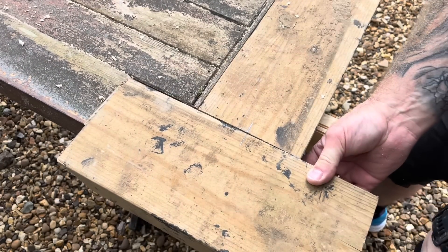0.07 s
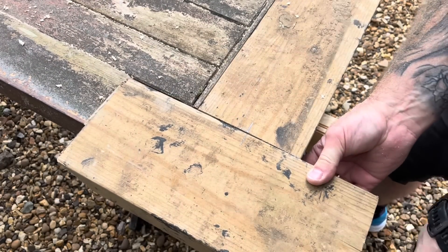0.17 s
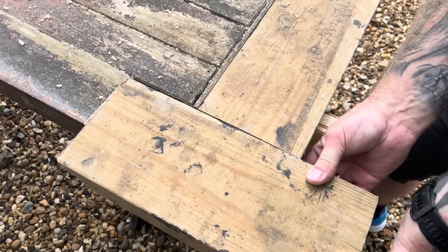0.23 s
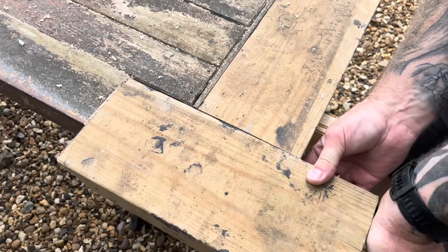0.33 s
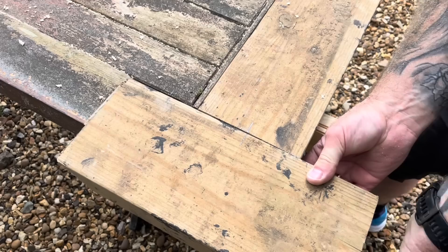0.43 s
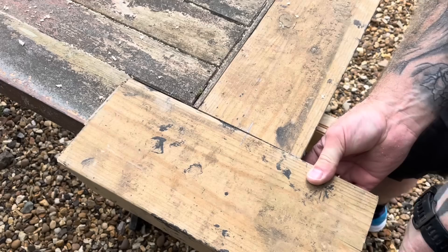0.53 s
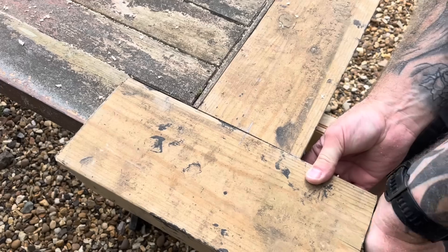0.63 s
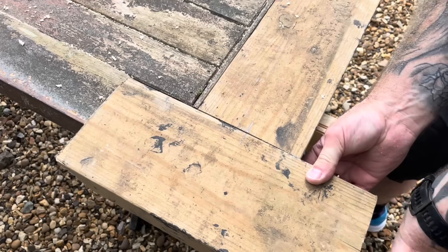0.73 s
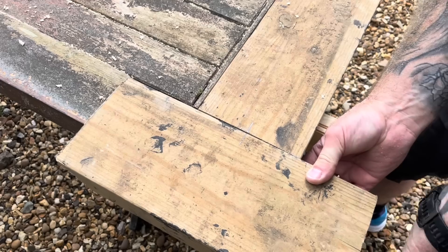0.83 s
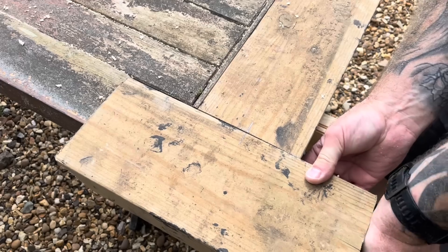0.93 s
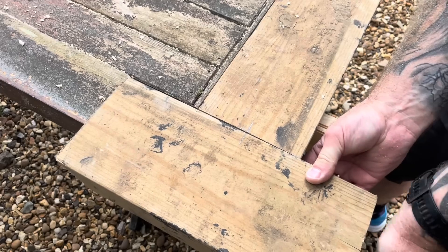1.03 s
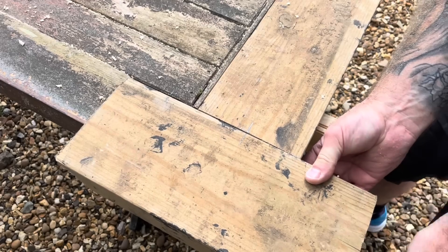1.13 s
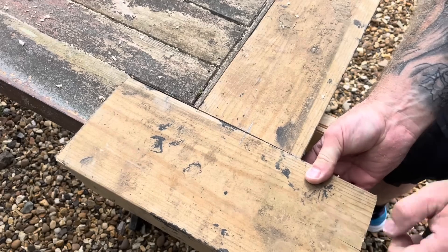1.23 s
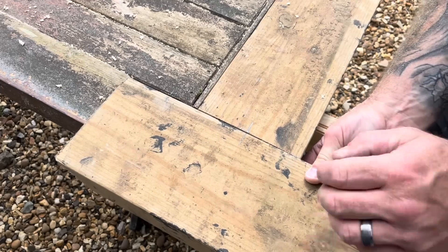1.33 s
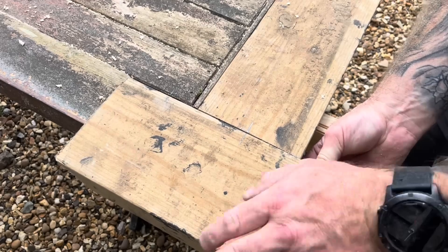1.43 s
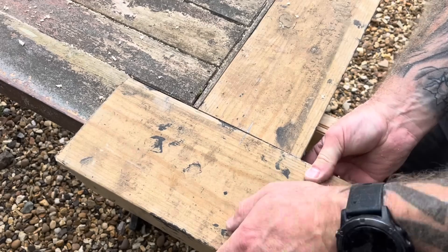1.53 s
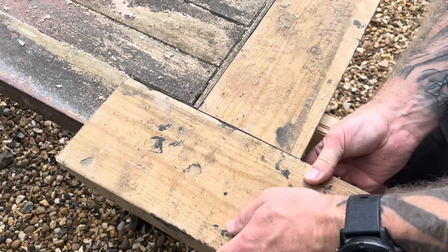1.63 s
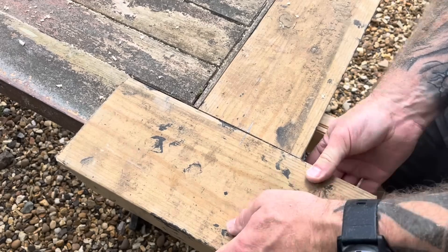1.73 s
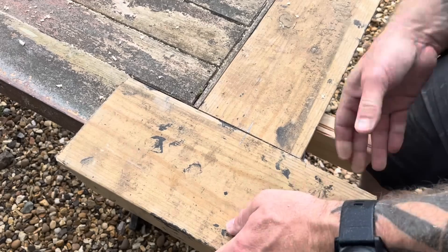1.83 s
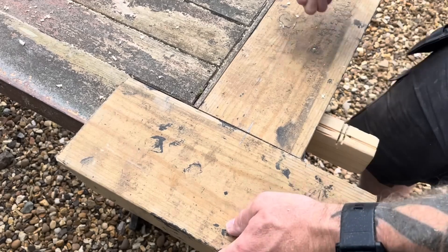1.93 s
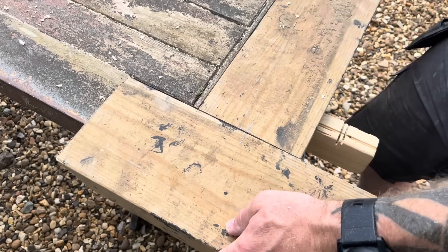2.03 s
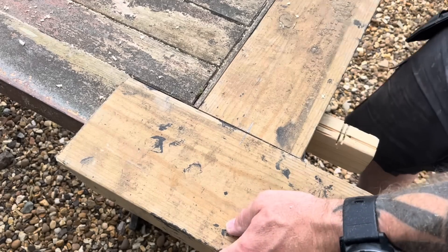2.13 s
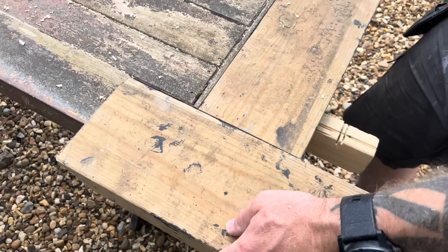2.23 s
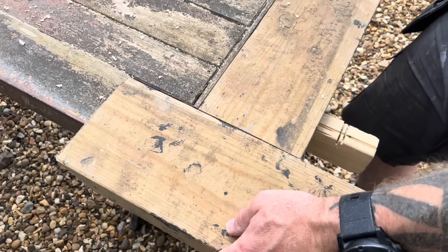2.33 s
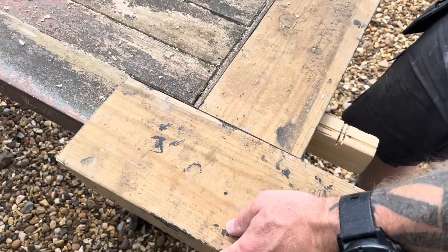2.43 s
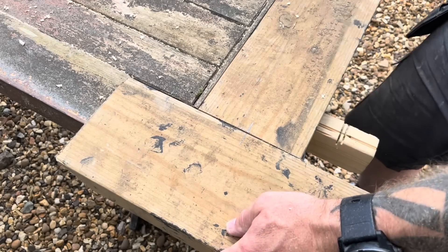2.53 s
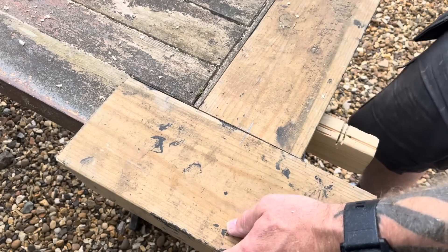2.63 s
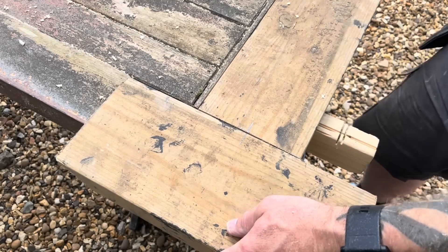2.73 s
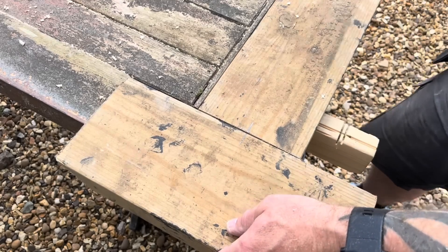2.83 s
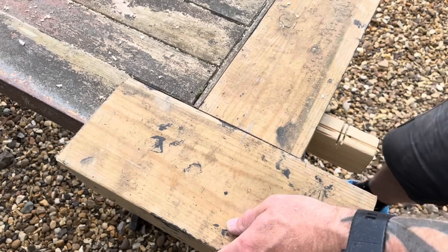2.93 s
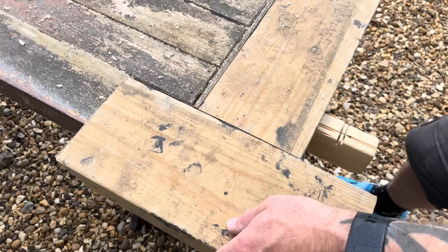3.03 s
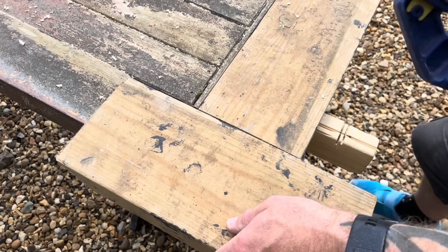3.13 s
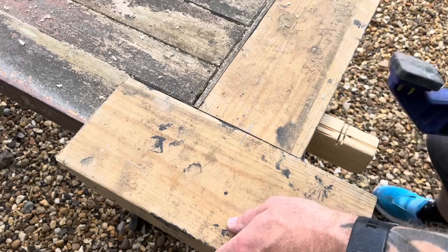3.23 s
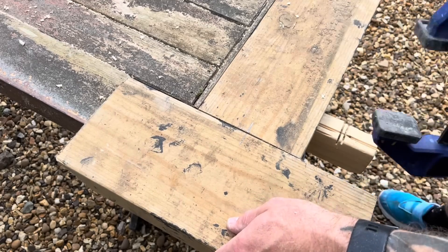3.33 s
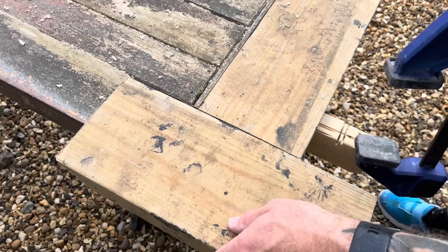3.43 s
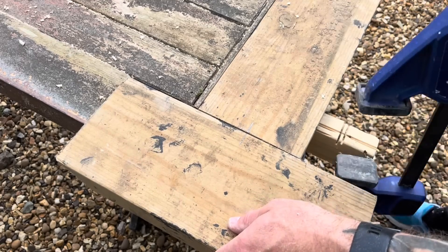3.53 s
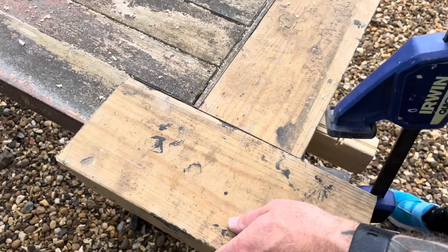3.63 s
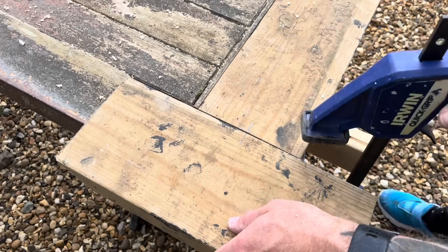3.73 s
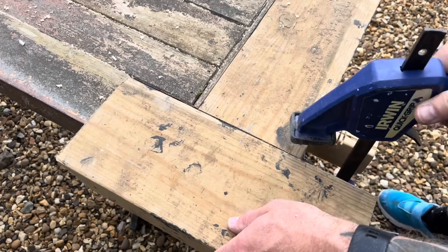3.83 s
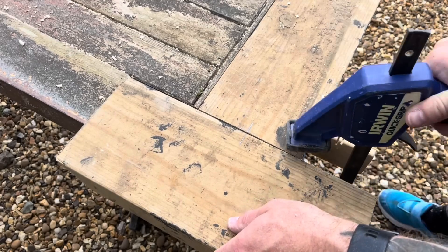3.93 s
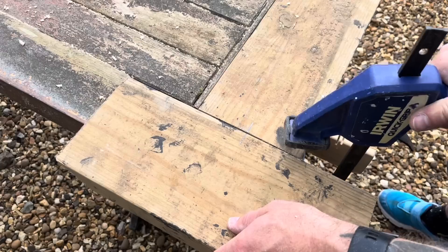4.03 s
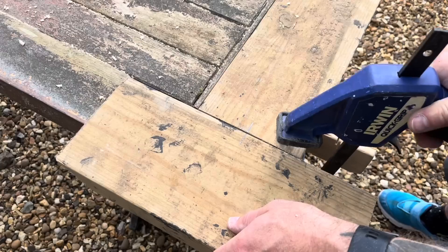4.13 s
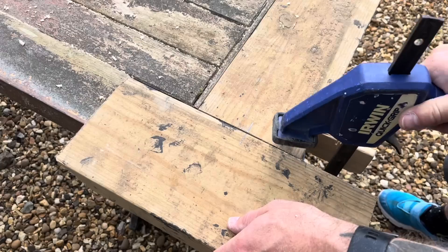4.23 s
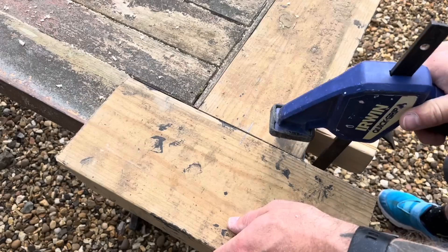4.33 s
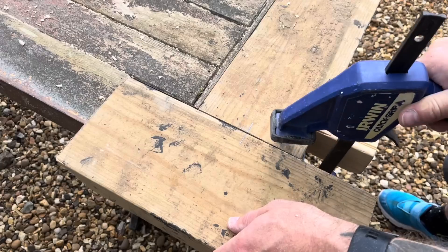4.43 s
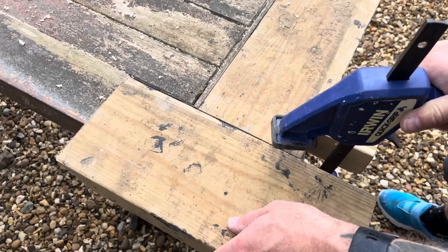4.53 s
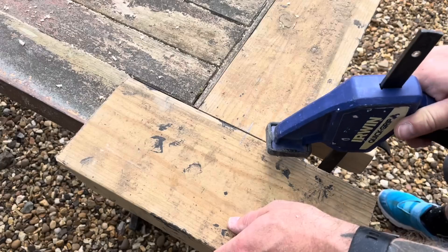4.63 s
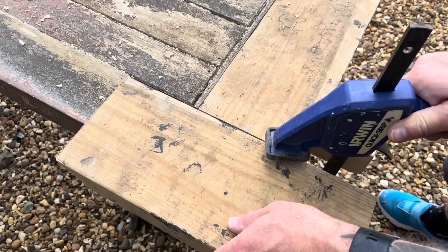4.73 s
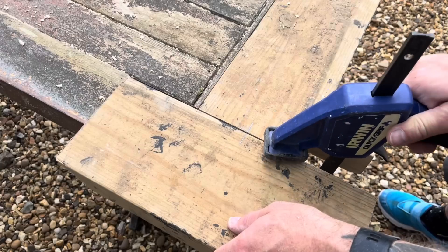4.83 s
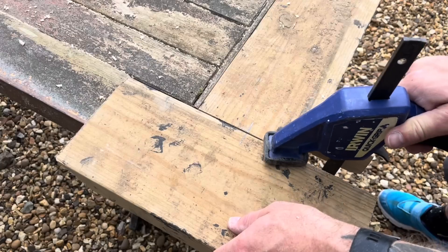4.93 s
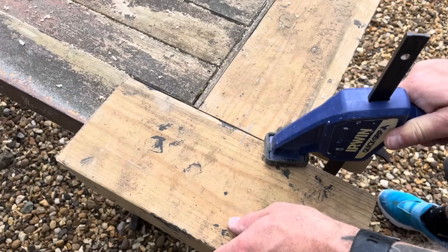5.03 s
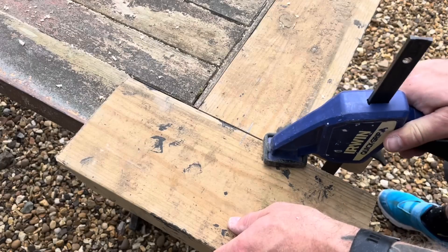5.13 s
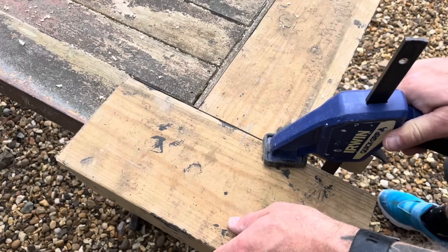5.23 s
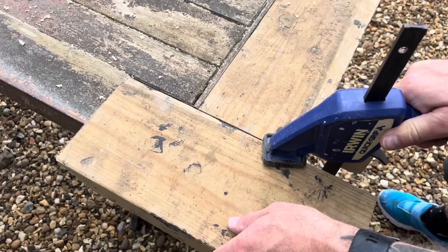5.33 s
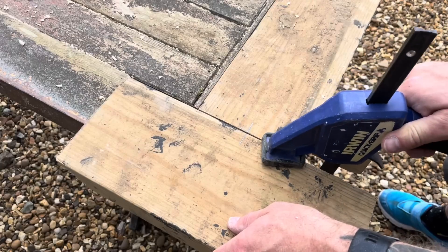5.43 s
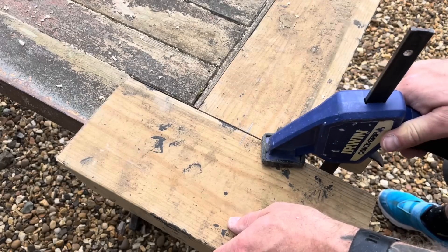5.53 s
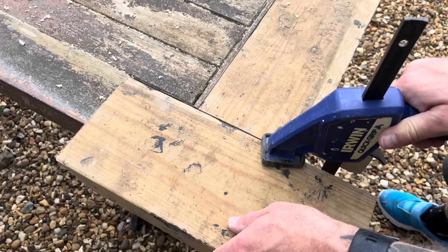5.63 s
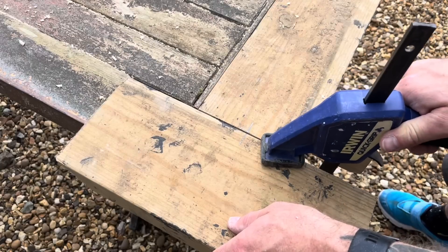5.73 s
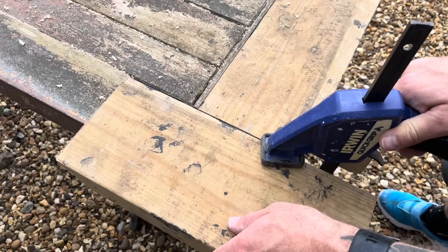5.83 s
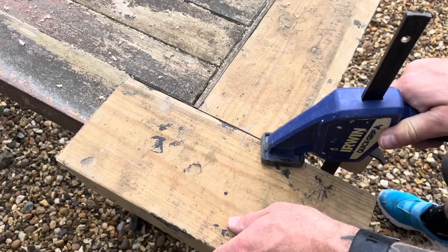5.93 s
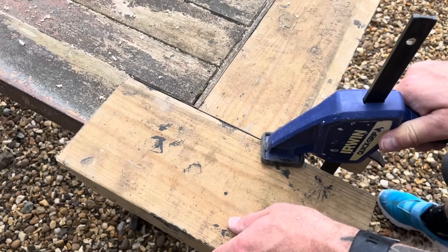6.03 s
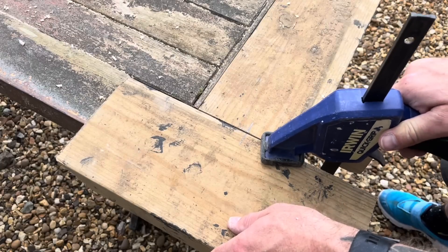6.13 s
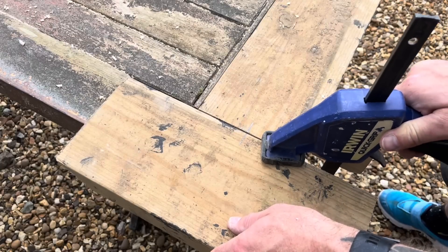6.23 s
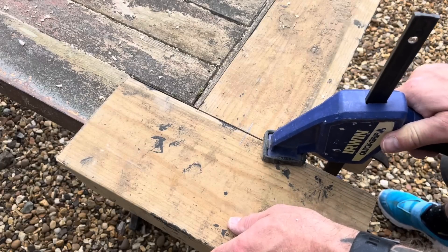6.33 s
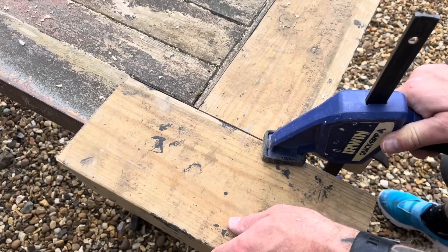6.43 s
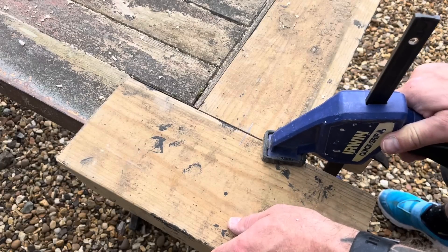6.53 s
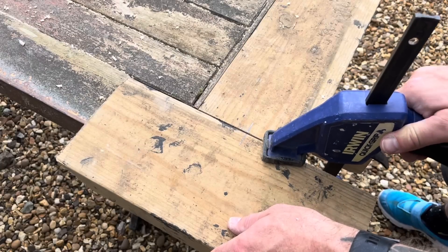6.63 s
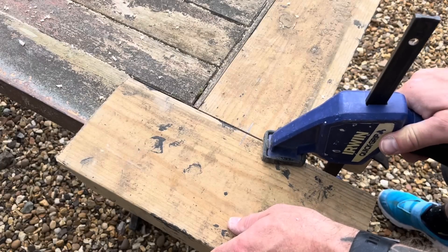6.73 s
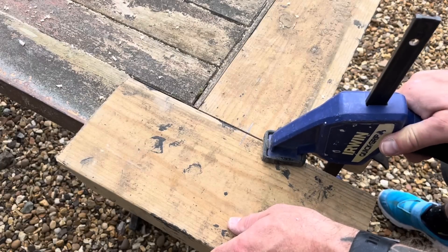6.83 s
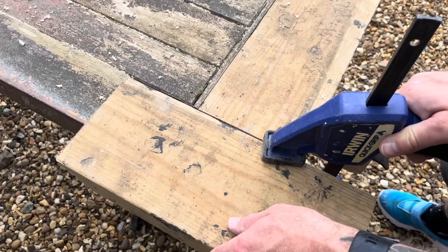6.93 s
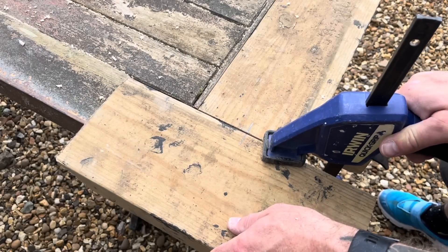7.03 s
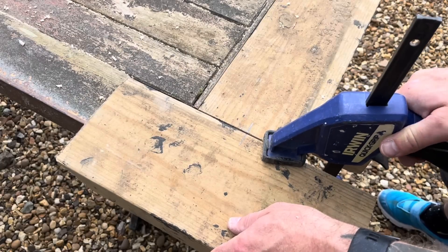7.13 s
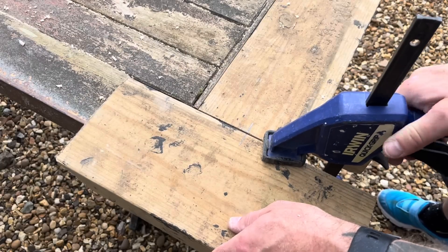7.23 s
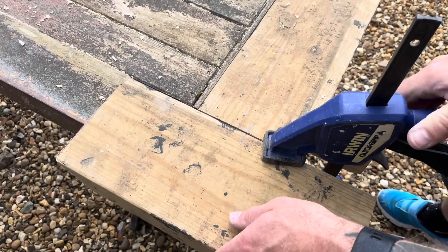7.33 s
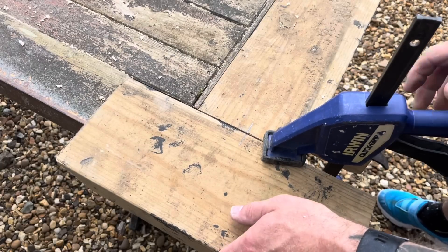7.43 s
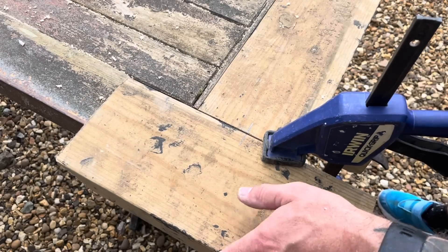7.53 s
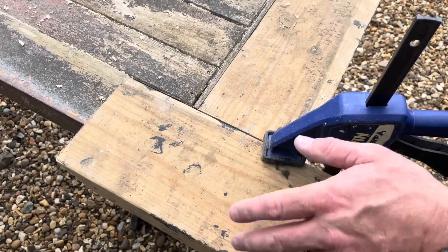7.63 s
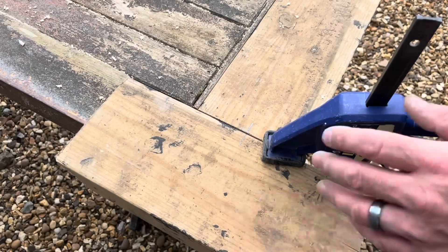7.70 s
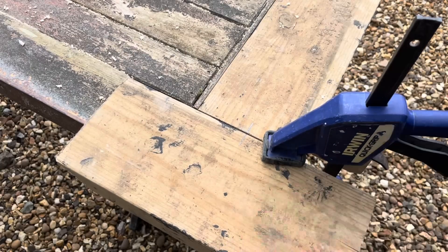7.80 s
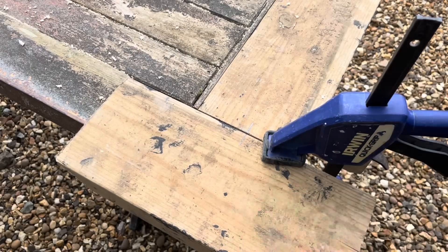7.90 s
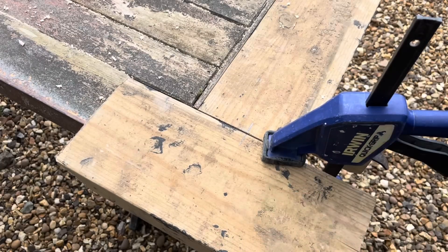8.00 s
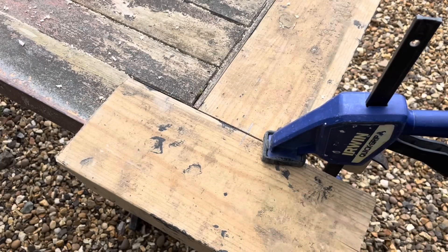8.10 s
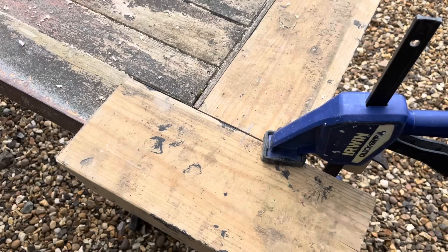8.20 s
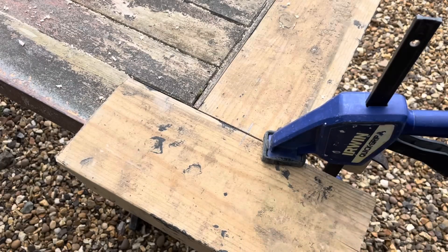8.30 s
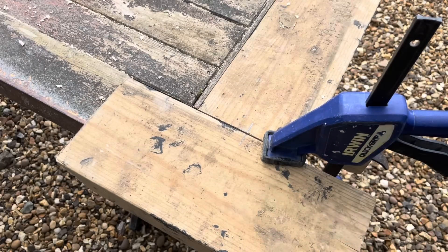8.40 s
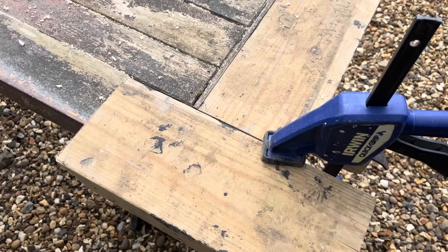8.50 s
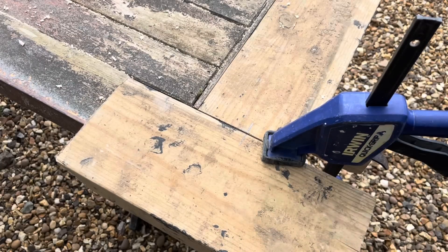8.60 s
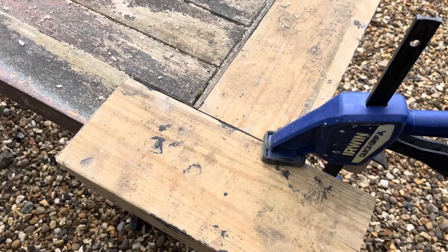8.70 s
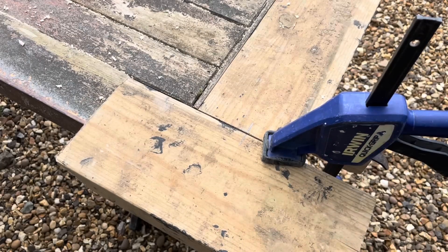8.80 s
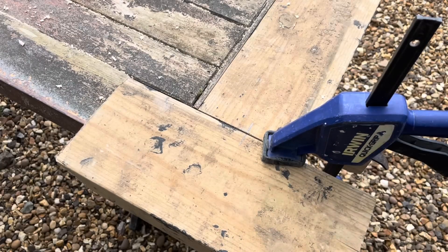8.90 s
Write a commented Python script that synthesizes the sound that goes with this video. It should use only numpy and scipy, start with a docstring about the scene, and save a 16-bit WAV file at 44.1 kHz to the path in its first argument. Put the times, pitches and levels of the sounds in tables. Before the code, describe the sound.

Outdoors and close up, timber knocks, stones clack underfoot, and a one-handed bar clamp clicks rapidly, then thumps the wood as it bites.

```python
"""A sleeve rustles close by over a soft outdoor wash; then wood taps, boards clack and boom as they are nudged.
Feet crunch in gravel, and a one-handed bar clamp is pumped: its metal snaps and rings, and the bar slides.
Once the jaws bite, the plate's snaps also thump the timber; at the end sleeves rustle and a shoe drags.
Ringing modes make the metal, stones and boards; shaped noise and tiny impacts make the friction, gravel and air.
Place: outdoors, with short reflections. Distance: close, but for the wash. Microphone: small, two ports."""
import sys
import numpy as np
from scipy import signal
from scipy.fft import rfft, irfft
from scipy.io import wavfile
from scipy.ndimage import uniform_filter1d

SR = 44100
rng = np.random.default_rng(int(sys.argv[2]) if len(sys.argv) > 2 else 0)


def persist_wave(psi):
    """Save psi, clipped to +-1, as 16-bit WAV."""
    counts = np.round(np.clip(psi, -1, 1) * 32767).astype(np.int16)
    wavfile.write(sys.argv[1], SR, np.atleast_2d(counts).T)


N = 395136  # length [samples]


def gain_of(db):
    """Decibels to amplitude."""
    return 10 ** (np.asarray(db) / 20)


def evened(x):
    """Scales to rms 1."""
    return x / np.sqrt(np.mean(x ** 2) + 1e-20)


def read(points, hz):
    """Reads a table on a log-frequency axis."""
    f, value = np.transpose(points)
    return np.interp(np.log(hz + 1), np.log(f + 1), value)


def add(mix, s, sound):
    """Mixes a stereo sound in at time s."""
    part = mix[:, max(round(s * SR), 0):][:, :sound.shape[1]]
    part += sound[:, :part.shape[1]]


def coloured(x, colour):
    """Gives x a spectrum and rms 1."""
    count = x.shape[-1]
    hz = np.fft.rfftfreq(count, 1 / SR)
    return evened(irfft(rfft(x) * gain_of(read(colour, hz)), count))


def pair(x, apart):
    """Three unrelated signals become two channels: one shared, and a share of its own for each."""
    apart = np.clip(apart, 0, 1)
    return np.sqrt(1 - apart) * x[0] + np.sqrt(apart) * x[1:]


def bands(edges):
    """Band-pass filters between neighbouring edges."""
    return [signal.butter(3, pass_hz, "band", fs=SR, output="sos") for pass_hz in zip(edges, edges[1:])]


SWELL_SHAPE = 1.5  # 1 gives a movement a pointed peak, 2 a rounded one


def swells(rows):
    """Gain over time of movements that each gather speed, peak and come to rest."""
    t, power = np.arange(N) / SR, 0
    for s, rise, fall, db in rows:
        away = np.maximum((s - t) / rise, (t - s) / fall)
        power = power + gain_of(db) ** 2 * np.exp(-2 * np.minimum(abs(away), 20) ** SWELL_SHAPE)
    return np.sqrt(power)


def grains(count, per_s, spread_db):
    """Three trains of tiny impacts of very uneven size."""
    size = gain_of(spread_db * np.minimum(rng.exponential(1, (3, count)), 4))
    struck = rng.standard_normal((3, count)) * (rng.random((3, count)) < per_s / SR)
    return evened(size * struck)


def unevenness(count, depth_db, size):
    """A gain that catches and lets go at random, smoothed over size samples."""
    return gain_of(depth_db * evened(uniform_filter1d(rng.standard_normal(count), size=size)))


def shifting(x, depth_db, size=9):
    """As a contact moves, different resonances come forward for a few hundredths of a second."""
    z = signal.stft(x, nperseg=512, noverlap=384)[2]
    patches = rng.standard_normal(z.shape[1:])
    for _ in range(2):
        patches = uniform_filter1d(patches, size=size, axis=1)  # along time
        patches = uniform_filter1d(patches, size=3, axis=0)  # along frequency
    moved = z * gain_of(depth_db * evened(patches))
    moved = signal.istft(moved, nperseg=512, noverlap=384)[1][:, :N]
    return evened(moved) * np.sqrt(np.mean(x ** 2))


def strokes(rows, colour, slowing_db):
    """Fine stick-slip friction: each stroke starts quickly, catches here and there, and slows to rest."""
    out = np.zeros((2, N))
    for s, length, db in rows:
        count = int(max(length, .01) * 1.048 * SR)
        slips = grains(count, per_s=9000, spread_db=2) * unevenness(count, 2.2, size=330)
        slowing = gain_of(slowing_db * (0.2015 - np.linspace(0, 1, count) ** 3))
        speed = signal.windows.tukey(count, .4) * slowing
        add(out, s, gain_of(db) * coloured(pair(slips, 0.04), colour) * speed)
    return out


def ring(modes, t, detune, apart, vary_db=3.0):
    """Dying modes; size and tuning vary from blow to blow, and phase differs a little between the two ports."""
    hz, db, t60 = np.transpose(modes)[:, :, None]
    shift, size, skew = rng.standard_normal((3, len(modes), 1))
    phase = 2 * np.pi * (hz * (1 + detune * shift) * t + rng.random((len(modes), 1)))
    fall = gain_of(db + vary_db * size - 60 * t / t60)
    return np.array([(fall * np.sin(phase + side * apart * skew)).sum(0) for side in (1, -1)])


def weigh(sound, filters, levels_db, count):
    """Sets how hard each band of a blow sounds over its first count samples."""
    out = 0
    for sos, db in zip(filters, levels_db):
        band = signal.sosfilt(sos, sound)
        level = np.sqrt(np.mean(band[:, :count] ** 2))
        out = -out + band * gain_of(db) / level  # neighbours alternate in sign
    return out


def blows(rows, shares_db):
    """Each contact's level in every band: its strength, the shares of its kind, and a tilt for its brightness."""
    above_middle = np.arange(len(shares_db)) - len(shares_db) // 2
    return [(s, *(db + np.array(shares_db) + bright_db * above_middle)) for s, db, bright_db, *_ in rows]


# edges of the bands of a hard contact: timber, bar, jaw, housing, metal tick (frequency [Hz])
CONTACT_EDGES = [200, 650, 1250, 2300, 5500, 15000]


def hits(rows, modes, crack_db, crack_t60, chatter_db, chatter_t60, detune, seated_db):
    """A hard contact: a crack, the ringing modes, and a short chatter of loose parts."""
    out, t = np.zeros((2, N)), np.arange(3072) / SR
    parts = bands(CONTACT_EDGES)
    crack = gain_of(crack_db - 60 * t / crack_t60)
    chatter = gain_of(chatter_db - 60 * t / chatter_t60)
    # the part rings freely for a few milliseconds, then seats and is damped
    onset = 1 - np.exp(-t / .0002)
    damping = onset * (np.exp(-(t / .0028) ** 2) + gain_of(seated_db))
    for s, *levels_db in rows:
        noise = pair(rng.standard_normal((3, len(t))), 0.044)
        blow = (ring(modes, t, detune, apart=0.51) + noise * (crack + chatter)) * damping
        add(out, s, weigh(blow, parts, levels_db, count=660))
    return out


# distant wash of air, relative spectrum (frequency [Hz], level [dB])
AIR_SPECTRUM = [(100, -18.5), (170, -6.5), (300, -1), (600, -5.5), (950, -8), (1400, -20.5), (2200, -26),
                (4000, -32), (8000, -46), (13000, -38.5), (16000, -43)]
# low rumble of the frame, relative spectrum (frequency [Hz], level [dB])
RUMBLE_SPECTRUM = [(15, -23.5), (35, -5), (58, 2), (85, -1.5), (130, -10), (220, -14), (500, -49.5)]
# shifting weight makes the frame rumble (peak time [s], rise [s], fall [s], level [dB])
WEIGHT_SHIFTS = [(1.55, 0.39, 0.38, -56.5), (2.26, 0.09, 0.36, -50.5), (2.8, 0.17, 0.3, -48),
                 (3.76, 0.074, 0.079, -50), (5.3, 0.3, 1.3, -56), (8.27, 0.078, 0.08, -54),
                 (8.94, 0.097, .08, -55)]


def outdoors(air_db=-66, rumble_db=-63):
    """Distant steady wash, different at each port, over a low rumble that grows when weight shifts."""
    air = coloured(pair(rng.standard_normal((3, N)), 0.83), AIR_SPECTRUM)
    rumble = coloured(pair(rng.standard_normal((3, N)), 0.16), RUMBLE_SPECTRUM)
    return gain_of(air_db) * air + np.hypot(gain_of(rumble_db), swells(WEIGHT_SHIFTS)) * rumble


# a hand or sleeve sweeps past, or the clamp rubs briefly around a late clack; levels before gain_db
# (peak time [s], rise [s], fall [s], level [dB], extra fizz [dB])
RUBS = [(.03, 0.055, 0.097, -71.5, -4), (.15, 0.035, 0.088, -72.5, -1), (.35, 0.074, 0.052, -78, 0),
        (.5, 0.052, 0.054, -75, 0), (0.681, 0.06, 0.06, -69.5, -7), (1.2, 0.073, 0.081, -66, -1.5),
        (1.595, 0.015, .025, -67, 3), (1.74, 0.047, 0.032, -69.5, 6.5), (1.9, 0.13, 0.14, -80.5, 7),
        (2.27, 0.0099, 0.032, -68, 0), (2.45, 0.065, .15, -67, 3), (2.82, 0.11, 0.06, -58.5, 3.5),
        (3.06, 0.071, 0.15, -70, -4), (3.304, 0.0059, 0.047, -58.5, -2), (6.073, .014, 0.014, -57, 4),
        (6.15, 0.033, 0.023, -69.5, -5), (6.28, 0.063, 0.058, -68.5, 2.5), (6.53, 0.026, 0.024, -64, -3),
        (7.15, 0.021, 0.037, -60.5, -6), (7.27, 0.07, 0.062, -76.5, -5), (7.471, .04, 0.095, -76, 2.5),
        (7.82, 0.15, 0.21, -65, -5.5), (8.1, 0.1, 0.083, -52.5, 3.5), (8.29, 0.047, 0.084, -56.5, 0.5),
        (8.6, 0.27, 0.12, -68, -2.5), (8.748, 0.014, 0.087, -47.5, 0), (8.95, 0.023, .04, -59, 10)]
# hiss of the rubbing, relative spectrum (frequency [Hz], level [dB])
HISS_SPECTRUM = [(600, 5.5), (2000, 8), (3500, 9.5), (6000, 5), (9000, 10), (13000, 9), (15500, -8)]
FIZZ_HZ = 8500  # skin on rough wood fizzes above this


def brush(gain_db=1):
    """Hands, sleeves and at times the clamp rubbing: a fine, bright hiss, each rub with its own share of fizz."""
    fibres = grains(N, per_s=16000, spread_db=2) * unevenness(N, 1.2, size=700)
    hiss = shifting(coloured(pair(fibres, 0.035), HISS_SPECTRUM), depth_db=3.0)
    fizz = signal.sosfiltfilt(signal.butter(4, FIZZ_HZ, "high", fs=SR, output="sos"), hiss)
    rubbing = swells([(s, rise, fall, db) for s, rise, fall, db, _ in RUBS])
    fizzing = swells([(s, rise, fall, db + fizz_db) for s, rise, fall, db, fizz_db in RUBS])
    return gain_of(gain_db) * (rubbing * (hiss - fizz) + fizzing * fizz)


# wood taps on wood (time [s], strength [dB], brightness [dB per band])
WOOD_TAPS = [(.166, -58.5, 1), (.617, -49, -1.5), (.7043, -51.5, -1), (1.8251, -38.5, 4), (1.8381, -44, 2),
             (2.4928, -56, -8), (2.5523, -52, -2), (2.876, -53, -1), (2.901, -55, -1), (3.066, -57.5, -1),
             (3.3854, -69.5, -9), (3.4996, -63.5, -4), (8.248, -50.5, -4.5), (8.4632, -62, -1),
             (8.9092, -55, 0)]
# pebbles clack together (time [s], strength [dB], brightness [dB per band])
STONE_CLACKS = [(.6718, -46.5, 4.5), (2.777, -50, -7), (2.7958, -49, -6), (2.8507, -40, 2.5),
                (2.9298, -42, -2), (2.98, -49, -3), (2.9906, -42.5, 0.5)]
# sharp bright ticks, from grit or on top of a wood tap (time [s], strength [dB], brightness [dB per band])
SHARP_TICKS = [(1.8251, -41, 1.5), (1.8788, -62.5, -2), (2.3802, -54, -4), (2.5393, -43, 0.5),
               (2.701, -50, 0), (2.813, -46, -1), (8.7274, -47.5, 0.5), (8.8224, -47, 1),
               (8.8355, -44, 1.5), (8.8473, -43, -1.5), (8.8932, -56, 4.5), (8.9465, -44.5, -3.5)]
# share of the strength in each contact band, for wood, stones and ticks (level [dB])
TAP_SHARES = [-8, 1, -7, -12, -19]
STONE_SHARES = [-14.5, -9.5, 1.5, -9, -6]
TICK_SHARES = [-6.5, -20, -12, -20, 1]
# what rings in small knocks (frequency [Hz], relative level [dB], t60 [s])
KNOCK_MODES = [(367, -7.5, 0.028), (580, -12, 0.0057), (810, -19, 0.0094), (1038, -16, 0.077),
               (1320, -12.5, 0.021), (2130, -7, 0.0085), (2310, -4.5, 0.017), (3060, 7.5, 0.022),
               (4100, -25, 0.0035), (5560, -7, 0.0089), (11460, -3, 0.0046)]


def knocks(gain_db=-2):
    """Wood taps, stone clacks and sharp ticks: a strong crack over short modes tuned afresh for each knock."""
    contacts = blows(WOOD_TAPS, TAP_SHARES) + blows(STONE_CLACKS, STONE_SHARES)
    contacts += blows(SHARP_TICKS, TICK_SHARES)
    return gain_of(gain_db) * hits(contacts, KNOCK_MODES, crack_db=8, crack_t60=.008, chatter_db=-3,
                                   chatter_t60=.05, detune=.07, seated_db=-4)


# a palm scuffing the boards (time [s], nominal length [s], level before slowing [dB])
PALM_SCUFFS = [(.606, 0.041, -48), (.924, 0.06, -55.5), (1.575, 0.044, -62), (1.725, 0.033, -62.5),
               (2.37, 0.086, -65.5)]
# palm on wood, relative spectrum (frequency [Hz], level [dB])
SCUFF_SPECTRUM = [(200, 15), (500, 8), (1500, 1.5), (2500, -7), (4000, -7), (8000, -8.5), (13000, -6),
                  (16000, 3.5)]


def scuffs():
    """A palm slips and catches over the boards and slows strongly."""
    return strokes(PALM_SCUFFS, SCUFF_SPECTRUM, slowing_db=23.5)


# hands, knees and the closing jaw push the boards (time [s], boom level [dB], knock level [dB])
BOARD_PUSHES = [(0.616, -37, -37.5), (0.937, -42, -40), (1.29, -49, -75), (1.603, -36, -59),
                (1.659, -41.5, -64), (1.748, -36.5, -79), (1.966, -49.5, -72), (2.427, -59, -45.5),
                (2.497, -66, -42.5), (2.807, -44.5, -71), (3.043, -43, -49), (4.982, -49.5, -46.5),
                (5.085, -41, -48.5), (5.158, -47, -43.5), (6.542, -56, -51), (7.148, -68, -60.5)]
# jolt against the strength of its snap, for loud snaps and for returns (boom level [dB], knock level [dB])
SNAP_JOLT = [-4.5, -7.5]
RETURN_JOLT = [-2, -6]
# what rings in the boards (frequency [Hz], relative level [dB], t60 [s])
BOARD_MODES = [(56.9, 2, 0.21), (86.9, 4.5, 0.12), (103.2, -3, 0.16), (128.5, -6.5, 0.11),
               (167.3, -7.5, 0.11), (217.3, -7.5, 0.079), (247, -21.5, 0.048), (315, -10, 0.085),
               (375.3, -12.5, 0.092), (440.5, -20.5, 0.12)]
# edges of the boom and knock bands (frequency [Hz])
BOOM_EDGES = [30, 130, 450]
BITE_S = 5.0  # after this the jaws grip, and each snap of the plate jolts the boards
PUSH_RISE = .012  # time constant with which the boards take up a push [s]


def jolts(rows, jolt_db):
    """Once the jaws bite, a snap thumps the timber in step with its strength."""
    return [(s, *(db + np.array(jolt_db))) for s, db, *_ in rows if s > BITE_S]


def thumps():
    """The boards take up a push slowly and boom on their frame."""
    out, t = np.zeros((2, N)), np.arange(16384) / SR
    pushes = BOARD_PUSHES + jolts(LOUD_SNAPS, SNAP_JOLT) + jolts(PLATE_RETURNS, RETURN_JOLT)
    for s, *levels_db in pushes:
        boom = ring(BOARD_MODES, t, 0.09, apart=0.12) * (1 - np.exp(-t / PUSH_RISE))
        add(out, s - .002, weigh(boom, bands(BOOM_EDGES), levels_db, count=2646))
    return out


# hollow clacks of board on board (time [s], decay to 1/e [s], level before onset and decay [dB])
BOARD_CLACKS = [(0.619, 0.032, -45.5), (.942, 0.031, -56), (2.701, 0.062, -45), (2.809, 0.007, -37.5),
                (3.042, .012, -64.5), (6.065, 0.026, -41), (6.294, 0.044, -48), (6.549, 0.025, -51),
                (7.144, 0.035, -44)]
# hollow wood, relative spectrum (frequency [Hz], level [dB])
CLACK_SPECTRUM = [(120, -27), (250, -7.5), (370, 0.5), (470, -5.5), (700, -7), (1100, -26), (2500, -32),
                  (8000, -60)]


def clacks():
    """Loose boards chatter against each other and die away."""
    out, t = np.zeros((2, N)), np.arange(4096) / SR
    for s, length, db in BOARD_CLACKS:
        chatter = coloured(pair(rng.standard_normal((3, len(t))), 0.2), CLACK_SPECTRUM)
        shape = (1 - np.exp(-t / 0.00044)) * np.exp(-(t / length) ** 2)
        add(out, s, gain_of(db) * chatter * shape)
    return out


def pebbles(order=2200):
    """Single stones clinking at random moments, a few cycles each."""
    out, t = np.zeros((2, N)), np.arange(768) / SR
    for moment, pitch, size, side in rng.random((order, 4)):
        hz = 500 * 7 ** pitch
        loudness = (.15 + size ** 3) / np.sqrt(hz)
        clink = loudness * np.sin(2 * np.pi * hz * t) * np.exp(-hz * t / 3)
        add(out, moment * N / SR, np.sqrt([[side], [1 - side]]) * clink)
    return evened(out)


# a foot presses into the gravel, levels before grit_db and pebbles_db
# (peak time [s], rise [s], fall [s], level [dB])
FOOT_PRESSES = [(2.39, 0.057, 0.1, -57), (2.5, 0.015, 0.023, -51.5), (2.555, 0.021, 0.021, -46.5),
                (2.715, 0.021, 0.21, -45.5), (3.065, 0.0075, 0.014, -52), (3.32, 0.092, 0.16, -62),
                (8.1, 0.023, .04, -44.5), (8.165, .02, 0.03, -48), (8.26, 0.052, 0.087, -45.5),
                (8.46, 0.03, 0.012, -50.5), (8.75, 0.015, 0.13, -53), (8.95, 0.034, .04, -47.5)]
# grinding grit, relative spectrum (frequency [Hz], level [dB])
GRAVEL_SPECTRUM = [(100, -47), (280, 7), (600, 2.5), (1000, 5.5), (1500, -2), (2600, -14.5), (4000, -14),
                   (8000, -20.5), (16000, -8)]


def crunch(grit_db=-1, pebbles_db=-5.5):
    """Gravel grinding underfoot: dense clumped grit, and single pebbles."""
    grit = grains(N, per_s=3000, spread_db=2.5) * unevenness(N, 2.5, size=450)
    grinding = gain_of(grit_db) * coloured(pair(grit, 0.54), GRAVEL_SPECTRUM)
    return swells(FOOT_PRESSES) * (grinding + gain_of(pebbles_db) * pebbles())


# the handle meets its stop, rattles in its play, or clacks as it is eased
# (time [s], strength [dB], brightness [dB per band])
HANDLE_CLACKS = [(3.6604, -52.5, 0), (3.7429, -42, 1), (3.9675, -50.5, 6), (3.9867, -32, 0.5),
                 (3.9922, -46.5, 4.5), (4.1275, -47, 0.5), (4.2482, -37.5, -1.5), (4.474, -29.5, 0.5),
                 (4.6343, -49.5, -0.5), (4.7486, -35.5, -1), (4.8866, -56, -4), (4.9032, -54.5, -4),
                 (4.9908, -57.5, -10), (6.5394, -43, 1.5), (7.146, -46.5, 2.5)]
# the drive plate snaps loudly on a squeeze, or once on a release, and the bar slides
# (time [s], strength [dB], brightness [dB per band], slide length [s], slide level [dB])
LOUD_SNAPS = [(3.6862, -36, -1, 0.095, -52), (3.8396, -28.5, 4, .05, -52.5),
              (3.9241, -28.5, 2.5, 0.078, -50), (4.1717, -30.5, 1, .084, -51),
              (4.4108, -32, -0.7, 0.076, -50.5), (4.6576, -33.5, -0.1, 0.13, -53.5),
              (4.9399, -32.5, -0.5, 0.12, -54.5), (5.2469, -39, -4, 0.12, -56.5),
              (5.5806, -38.5, -3.5, 0.081, -58), (5.8972, -38.5, -4.5, 0.085, -55.5),
              (6.29, -44, -5, 0.049, -61)]
# the handle is let go, the plate springs back along the bar
# (time [s], strength [dB], brightness [dB per band], slide length [s], slide level [dB])
PLATE_RETURNS = [(4.08, -46, -1, 0.053, -45.5), (4.318, -44, -1.5, .047, -47),
                 (4.5684, -43.5, -1.5, 0.058, -46), (4.8214, -42.5, -0.5, 0.047, -48.5),
                 (5.1044, -44, -1.4, 0.059, -49.5), (5.4224, -44, -1.3, 0.053, -55.5),
                 (5.7312, -43, 0, 0.045, -53), (6.066, -53, 1.5, 0.033, -59)]
# share of the strength in each contact band, for loud snaps, returns and handle clacks (level [dB])
SNAP_SHARES = [-11, -6, -0.5, 0, -27.5]
RETURN_SHARES = [-1, 4.5, -3, -1, -4]
HANDLE_SHARES = [-14, -7.5, -2.5, -0.5, -18]
# what rings in the clamp (frequency [Hz], relative level [dB], t60 [s])
CLAMP_MODES = [(418, -12, 0.067), (628, -6, 0.049), (860, -7, 0.025), (908.4, -5, 0.062), (1036, -5, 0.049),
               (1250, -6.5, 0.024), (1432, 0.5, 0.0067), (1702, 0.5, 0.038), (1842, 2, 0.041),
               (2010, 3.5, 0.023), (2330, -5, 0.016), (2675, 2.5, 0.013), (3000, 6.5, 0.0089),
               (3555, 0, .015), (3980, -3, 0.013), (4700, -4, 0.0067), (6396, -29, .015)]
CLAMP_DETUNE = .008  # share by which the modes move from snap to snap


def clamp():
    """Drive plate and handle strike in the clamp: a crack, nearly fixed metal modes and a longer chatter."""
    snaps = blows(LOUD_SNAPS, SNAP_SHARES) + blows(PLATE_RETURNS, RETURN_SHARES)
    snaps += blows(HANDLE_CLACKS, HANDLE_SHARES)
    return hits(snaps, CLAMP_MODES, crack_db=1.5, crack_t60=.007, chatter_db=-9.0, chatter_t60=0.057,
                detune=CLAMP_DETUNE, seated_db=1.5)


# steel bar in the plate, relative spectrum (frequency [Hz], level [dB])
SLIDE_SPECTRUM = [(200, -24), (600, 0), (1100, -1), (1900, 4), (2500, -3.5), (3300, 5.5), (4200, -5.5),
                  (4750, -1), (5200, -5.5), (6000, -8), (7500, -11), (12500, -9), (16000, -30.5)]
SLIDE_LAG_S = 0.0049  # the bar starts to slide this long after a snap


def slides():
    """The bar slides through the plate just after every loud snap and return."""
    feeds = [(s + SLIDE_LAG_S, length, db) for s, _, _, length, db in LOUD_SNAPS + PLATE_RETURNS]
    return shifting(strokes(feeds, SLIDE_SPECTRUM, slowing_db=13.5), depth_db=2.0)


# a shoe sole dragging (time [s], nominal length [s], level before slowing [dB])
SHOE_DRAGS = [(8.742, 0.1, -48), (8.906, 0.0077, -46), (8.926, 0.041, -57)]
# sole on gravel, relative spectrum (frequency [Hz], level [dB])
SOLE_SPECTRUM = [(150, -20), (350, -6), (480, 7), (650, -4), (1200, -24), (3000, -34), (8000, -25),
                 (16000, -37)]


def drags():
    """A shoe sole slips and catches over the gravel and slows less than the palm."""
    return strokes(SHOE_DRAGS, SOLE_SPECTRUM, slowing_db=10)


# first reflections off boards and ground (delay [s], level [dB])
FIRST_ECHOES = [(.0062, -21), (.0085, -22.5)]


def yard(x, scatter_db=-19, t60=0.13, build=0.005):
    """Close reflections, and a thin scatter off walls and fences."""
    t = np.arange(SR // 2) / SR
    taps = rng.standard_normal((2, len(t))) * (rng.random((2, len(t))) < 3000 / SR)
    taps *= gain_of(-60 * t / t60) * (1 - np.exp(-t / build))
    taps *= gain_of(scatter_db) / np.linalg.norm(taps[0])
    taps[:, 0] = 1  # direct sound
    for s, db in FIRST_ECHOES:
        taps[:, round(s * SR)] += gain_of(db)
    return signal.fftconvolve(x, taps, axes=1)[:, :N]


def scene():
    """Clamp, timber and gravel in the open air; the close contacts also reflect off the yard."""
    friction = slides() + scuffs() + drags()
    close = clamp() + knocks() + friction + clacks()
    return yard(close) + thumps() + crunch() + brush() + outdoors()


# phase by which the left port leads (frequency [Hz], phase [rad])
PORT_PHASE = [(250, 0), (700, -.55), (1800, -.55), (2400, .2), (3100, 1.1), (4500, .7), (5300, 1),
              (5800, -1.8), (6700, -1), (7300, -2.4), (8400, -3.14), (10000, -4), (12800, -6.1),
              (14000, -6.28)]
# how much louder the right port hears (frequency [Hz], level [dB])
RIGHT_LEAN = [(120, -0.5), (600, 1.5), (1100, 0.7), (2000, 0.5), (4500, -2.5), (9000, 0.5)]
# the microphone's top end (frequency [Hz], level [dB])
MIC_TOP = [(9000, 0), (12500, -1.5), (14500, -7), (16000, -14.5)]
EDGE_HZ = 16000  # band limit


def record(dry):
    """The two ports differ in phase and level by frequency; the treble rolls off up to the band limit."""
    hz = np.fft.rfftfreq(N, 1 / SR)
    # each port takes half of the phase and level difference
    left = np.exp(.5j * read(PORT_PHASE, hz)) * gain_of(-.5 * read(RIGHT_LEAN, hz))
    ports = irfft(rfft(dry) * np.array([left, 1 / left]) * gain_of(read(MIC_TOP, hz)), N)
    band_limit = signal.firwin(511, EDGE_HZ, window=("kaiser", 9), fs=SR)
    return signal.oaconvolve(ports, band_limit[None], "same")


dry = scene()
out = record(dry)
persist_wave(out)
```